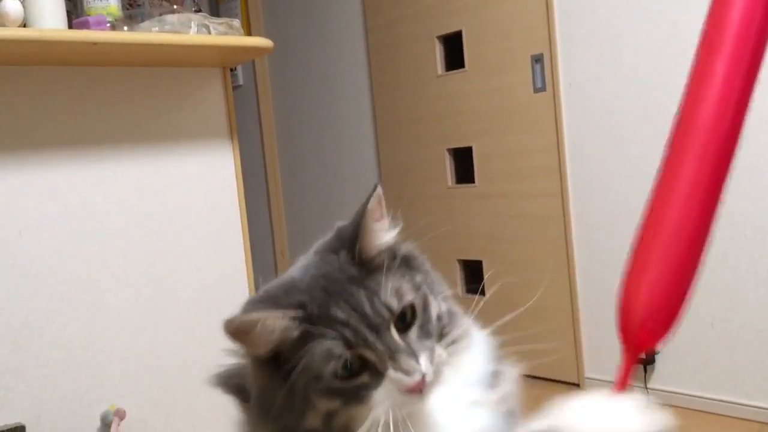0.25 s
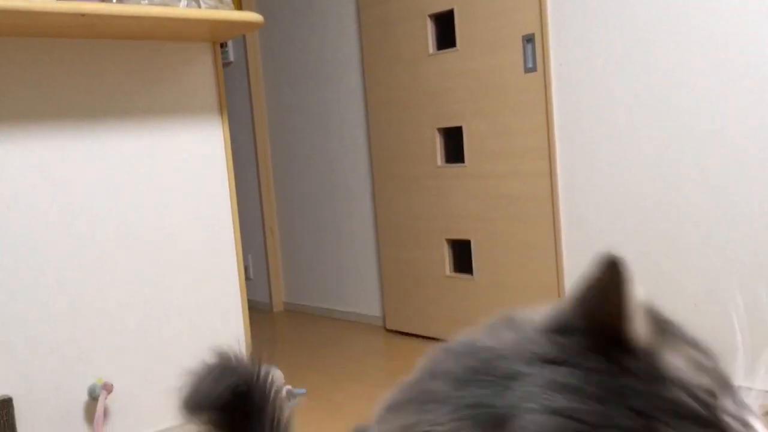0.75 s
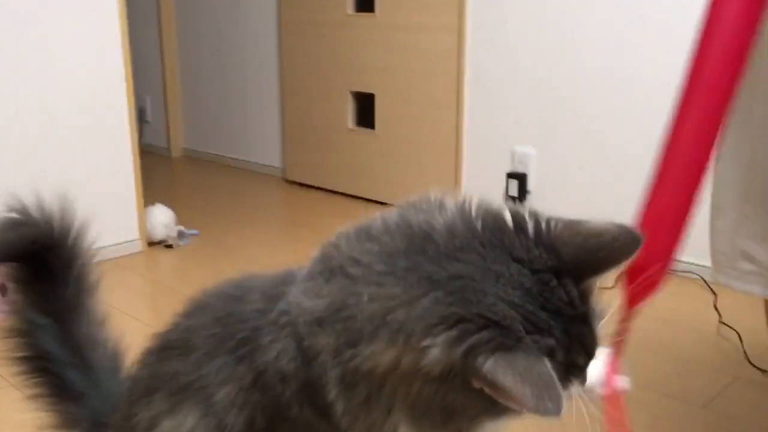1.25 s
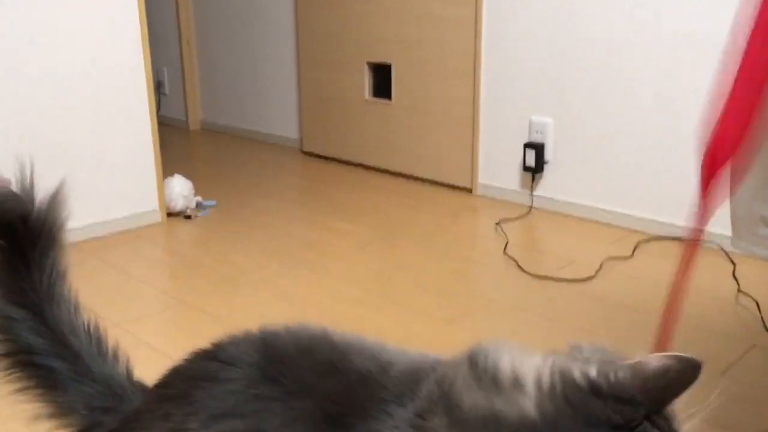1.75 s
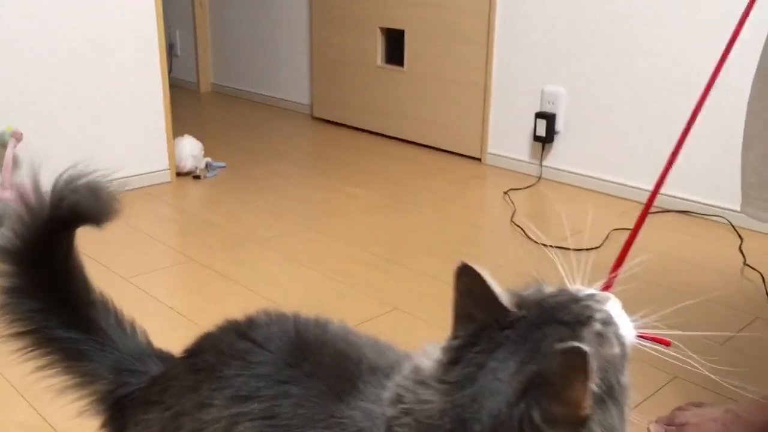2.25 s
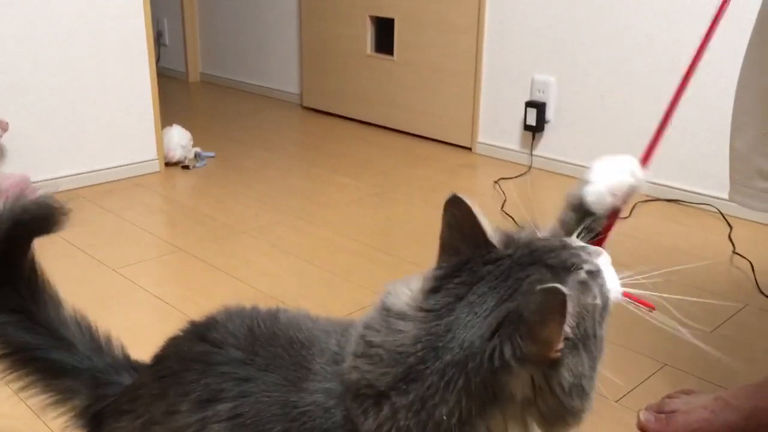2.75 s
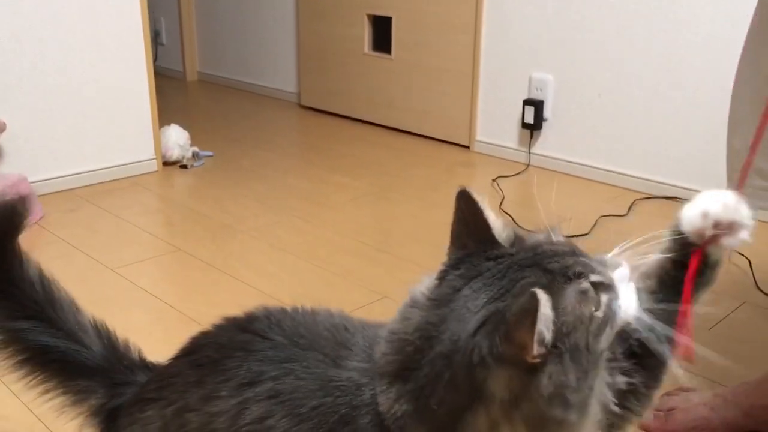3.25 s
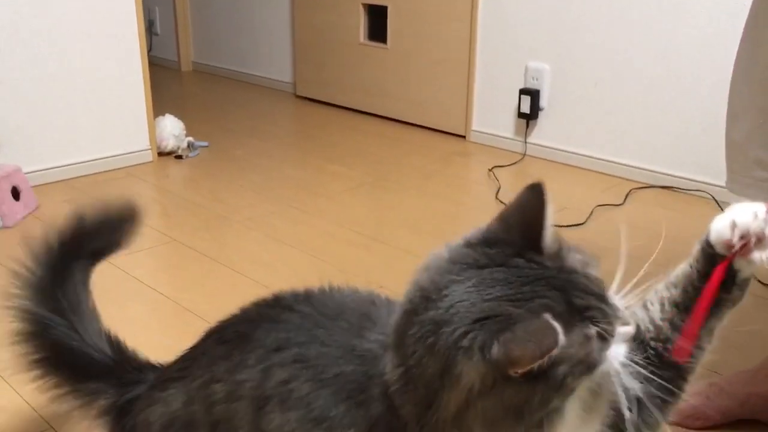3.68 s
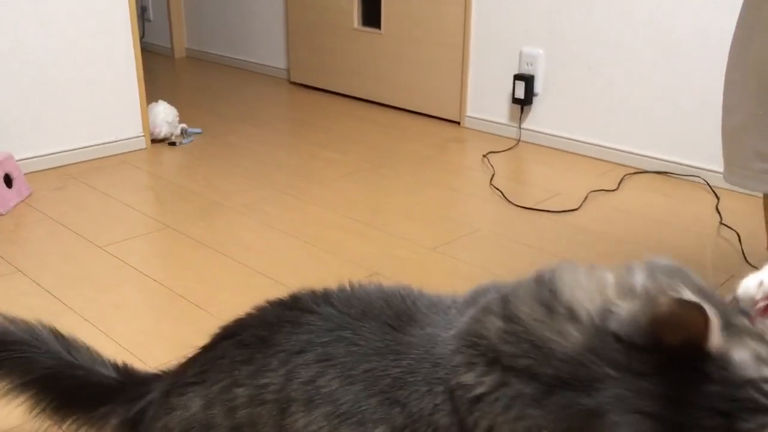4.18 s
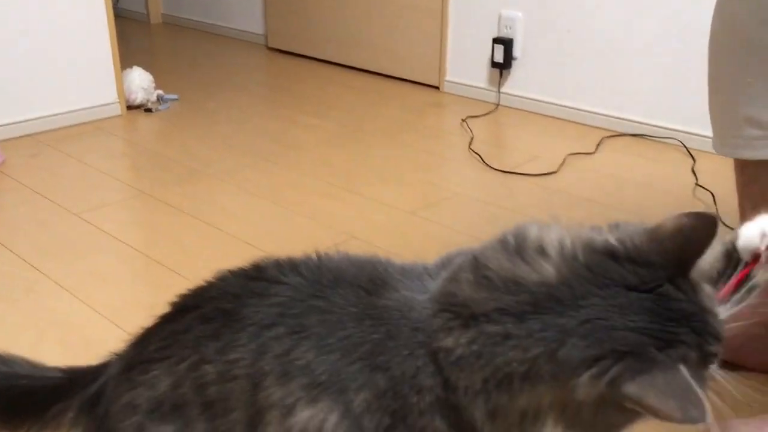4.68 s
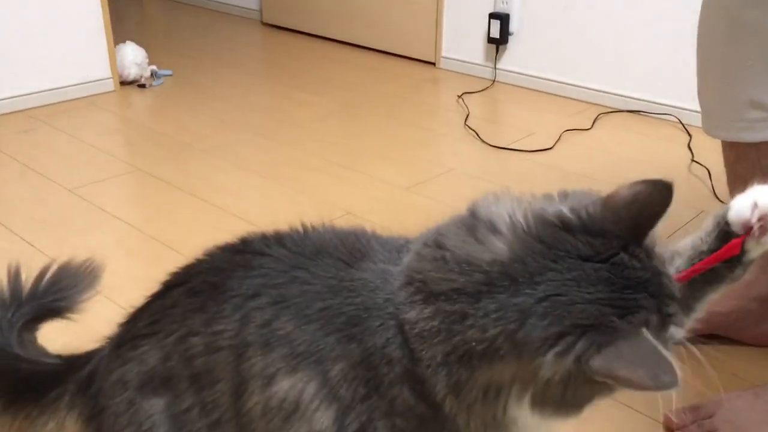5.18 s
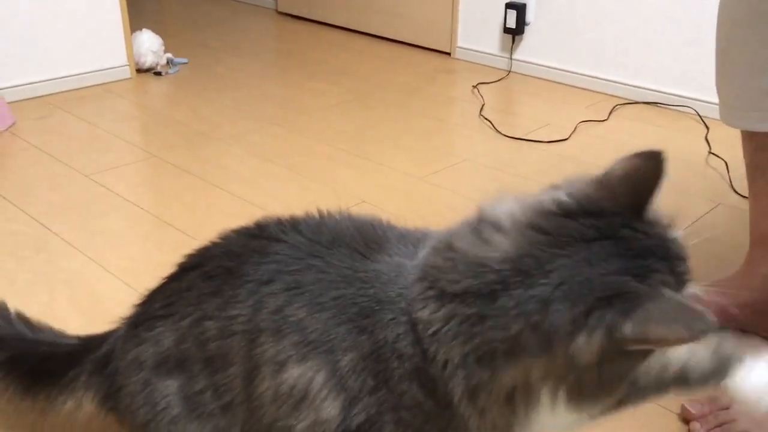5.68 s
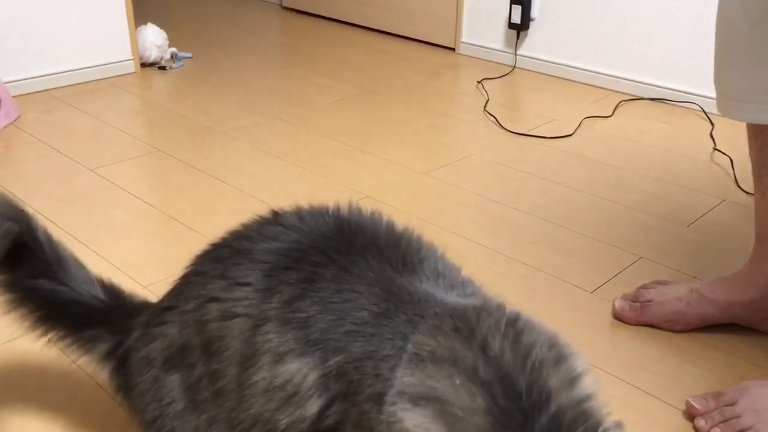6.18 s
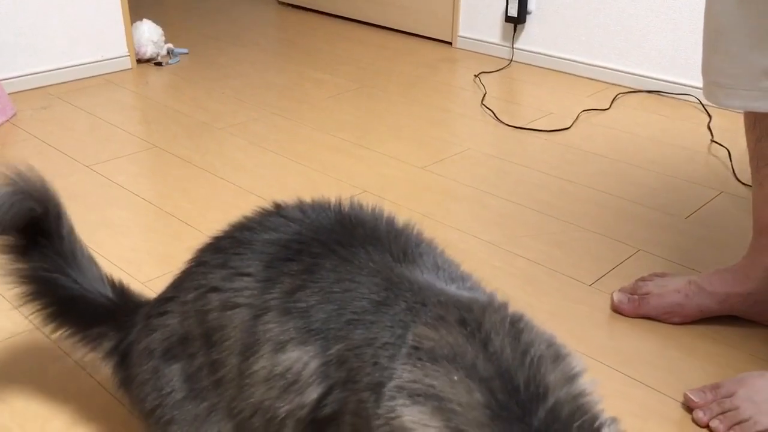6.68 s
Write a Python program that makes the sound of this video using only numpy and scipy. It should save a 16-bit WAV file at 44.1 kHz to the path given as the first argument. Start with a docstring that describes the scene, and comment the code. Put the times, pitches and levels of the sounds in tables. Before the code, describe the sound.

Close in a small, short-echoed room with a wooden floor, a cat bats a long rubber balloon with faint taps, clicks and creaks. The skin tears with a puff and a brief fluttering jet of air. Two small rubbery plucks follow, then quiet, then a loud sharp snap as the limp rubber whips back. A low beating machine hum runs underneath.

```python
"""Cat and long balloon

On a wooden floor in a small room, a cat plays with a long balloon: cracks of noise for clicks and
creaks, short decaying tones for the boards, brushing noise for fur and paws. The skin tears and a jet of
fluttering noise rushes out for a quarter of a second. The cat tugs at the limp rubber, which whips back
with a sharp snap. Two machines hum as sine tones over noise for rumble, room air and a far drone."""
import sys
import numpy as np
from scipy import signal
from scipy.fft import rfft, irfft, next_fast_len
from scipy.io import wavfile
from scipy.ndimage import map_coordinates

SR = 44100
rng = np.random.default_rng(int(sys.argv[2]) if len(sys.argv) > 2 else 0)


def file_out(sig):
    """Save sig as 16-bit WAV at sys.argv[1]."""
    # one column per channel
    cols = np.atleast_2d(sig).T
    # limit, then scale
    lim = np.clip(cols, -1, 1)
    pcm = np.round(lim * 32767).astype(np.int16)
    wavfile.write(sys.argv[1], SR, pcm)


N = 305304  # length [samples]


def amp(db):
    """Decibels to gain."""
    return 10 ** (np.asarray(db) / 20)


def unit(x):
    """Scale to rms 1."""
    return x / np.sqrt(np.mean(x ** 2) + 1e-20)


def along(points, hz):
    """Read (frequency [Hz], value) points on a log frequency axis."""
    f, v = np.transpose(points)
    return np.interp(np.log(hz + 1), np.log(f + 1), v)


def wobble(rate):
    """A smooth random curve, rate knots a second."""
    knots = rng.standard_normal(int(N * rate / SR) + 4)
    fine = np.arange(0, len(knots) - 1, 0.125)
    curve = map_coordinates(knots, [fine])  # cubic spline through the knots
    return np.interp(np.arange(N) * rate / SR, fine, curve)


def held(start, length, rise, fall):
    """Gain per sample: a straight rise, a hold until start + length, an exponential release."""
    t = np.arange(N) / SR - start
    return np.clip(t / rise, 0, 1) * np.exp(-np.maximum(t - length, 0) / fall)


def band(low_hz, high_hz):
    """(frequency [Hz], level [dB]) colour of a band with steep edges."""
    hz = np.geomspace(100, 20000, 40)
    low_edge = 1 + (low_hz / hz) ** 6
    high_edge = 1 + (hz / high_hz) ** 9
    return np.c_[hz, -10 * np.log10(low_edge * high_edge)]


def noise(spectrum, size=N):
    """Random-phase noise of rms 1 with the given colour."""
    m = next_fast_len(size)
    hz = np.fft.rfftfreq(m, 1 / SR)
    phases = np.exp(2j * np.pi * rng.random(len(hz)))
    return unit(irfft(amp(along(spectrum, hz)) * phases, m)[:size])


def burst(spectrum, length, steep):
    """A crack with an even, smooth colour and rms 1 over its length; steep sets how abruptly it ends."""
    t = np.arange(2048) / SR
    shape = (1 - np.exp(-t / 0.0002)) / (1 + (t / length) ** steep)
    # Only the phases are random, so the colour stays smooth.
    scatter = np.angle(rfft(shape * rng.standard_normal(len(t))))
    colour = amp(along(spectrum, np.fft.rfftfreq(len(t), 1 / SR)))
    x = np.sqrt(shape) * irfft(colour * np.exp(1j * scatter))
    return x * np.sqrt(length * SR / np.sum(x ** 2))


def ring(hz, t60, attack):
    """One dying mode: a sine that loses 60 dB in t60 seconds."""
    t = np.arange(SR // 2) / SR
    return np.sin(2 * np.pi * hz * t) * amp(-60 * t / t60) * (1 - np.exp(-t / attack))


def add(track, s, sound):
    """Mix a sound into the track at time s."""
    part = track[round(s * SR):][:len(sound)]
    part += sound[:len(part)]


THUMP_ATTACK_S = 0.0011  # rise of every soft blow
# air through the hole: it builds up as the hole widens, swells, and stops when the tube is empty
JET_START_S, JET_LENGTH_S, JET_RISE_S, JET_FALL_S = 1.782, 0.24, 0.024, 0.002
JET_START_DB, JET_SWELL_DB_PER_S = -34, 9.5
# colour of the escaping air: (frequency [Hz], relative density [dB])
JET_COLOUR = [(150, -13.5), (300, -14), (470, -28), (800, -14), (1200, -19), (2200, -11), (3000, -16),
              (4700, -8.5), (5900, -3.5), (9500, -1), (13500, -2), (15800, -7.5)]
# the hole tears open, the empty tube collapses: (time [s], level [dB], length [s])
PUFFS = [(1.7834, -30.5, 0.013), (2.018, -38.5, 0.0028)]
# colour of both puffs: (frequency [Hz], relative density [dB])
PUFF_COLOUR = [(100, 9), (400, -1.5), (1300, 0.5), (2200, -4), (3200, -11.5), (8000, -3.5)]
# the tube shudders after it tears: (delay after jet start [s], level [dB], frequency [Hz], t60 [s])
SHUDDERS = [(.004, -30.5, 236.1, .035), (0.017, -32, 71, 0.22)]


def puncture():
    """The skin tears with a puff and a shudder; a fluttering jet flows until the tube is empty."""
    flutter = unit(amp(0.55 * wobble(120) + 1.1 * wobble(1100)))
    age = np.clip(np.arange(N) / SR - JET_START_S, 0, JET_LENGTH_S)
    swell = amp(JET_START_DB + JET_SWELL_DB_PER_S * age)
    flow = swell * held(JET_START_S, JET_LENGTH_S, JET_RISE_S, JET_FALL_S)
    out = flow * flutter * noise(JET_COLOUR)
    for s, db, length in PUFFS:
        add(out, s, amp(db) * burst(PUFF_COLOUR, length, steep=1.6))
    for delay, db, hz, t60 in SHUDDERS:
        add(out, JET_START_S + delay, amp(db) * ring(hz, t60, THUMP_ATTACK_S))
    return out


# the rubber lets go, flies back and slaps home: (time [s], level [dB], length [s])
SNAPS = [(5.5959, -21, 0.00056), (5.597, -33, 0.0029), (5.6018, -12, 0.0033), (5.6033, -26, 0.0023)]
# colour of the slap: (frequency [Hz], relative density [dB])
SLAP_COLOUR = [(100, -12), (400, -9.5), (1200, -8.5), (2600, -7), (3700, 1.5), (4700, -1.5), (5900, 1),
               (7300, 0.5), (9000, -4.5), (10300, -3), (11200, 6), (12300, -1), (15500, 1), (17000, -4.5)]
THUD_DB, THUD_HZ, THUD_T60_S = -23.5, 190, 0.013  # the weight of the rubber landing


def snap():
    """The stretched balloon is released and slaps back on itself; its last contact adds a small thud."""
    out = np.zeros(N)
    for s, db, length in SNAPS:
        add(out, s, amp(db) * burst(SLAP_COLOUR, length, steep=4.5))
    last_contact_s = SNAPS[-1][0]
    add(out, last_contact_s, amp(THUD_DB) * ring(THUD_HZ, THUD_T60_S, THUMP_ATTACK_S))
    return out


# sharp clicks of claws, and of the balloon's end landing: (time [s], level [dB], low band edge [Hz])
CLICKS = [(0.2265, -47, 1630), (.706, -54, 1000), (1.5928, -45.5, 1470), (1.5941, -35.5, 9500),
          (3.1023, -39.5, 1430), (3.2421, -33.5, 1470), (3.802, -68, 1700), (4.935, -69, 1500),
          (4.9705, -56, 1440), (5.58, -53.5, 3000), (5.7596, -47, 2950)]
CLICK_S, CLICK_SPAN = 0.0015, 5.2  # length of a click; its top band edge over its low edge
# dull creaks of slipping rubber, the last from the balloon's end landing:
# (time [s], nominal peak level [dB])
CREAKS = [(0.4, -56), (0.611, -55.5), (1.5167, -60), (1.5489, -60), (1.5655, -49.5), (1.6114, -45),
          (1.6447, -45), (1.6573, -44), (5.7646, -42.5)]
CREAK_S, CREAK_LOW_HZ, CREAK_HIGH_HZ = 0.003, 1400, 3000
CREAK_RMS_DB = -9.5  # rms relative to the nominal peak
# the taut rubber slips off a claw: (time [s], level [dB] before the mode levels)
PLUCKS = [(3.101, -43.5), (3.2422, -31)]
# modes of the taut skin: (frequency [Hz], level relative to the pluck [dB], t60 [s])
SKIN_MODES = [(610, -16.5, 0.04576), (1220, -9, .02), (1976, 3, 0.01546), (1919.2, -17.5, 0.22),
              (2360, -4, 0.02), (2960, -3, 0.0086), (3372.4, -10, 0.01384), (4757.8, -3.5, 0.014),
              (6520, -9, 0.025)]


def clicks_and_creaks():
    """Clicks are tiny cracks, creaks are duller ones; taut rubber slipping off a claw rings the skin."""
    out = np.zeros(N)
    for s, db, low_hz in CLICKS:
        colour = band(low_hz, CLICK_SPAN * low_hz)
        add(out, s, amp(db) * burst(colour, CLICK_S, steep=2.5))
    creak_colour = band(CREAK_LOW_HZ, CREAK_HIGH_HZ)
    for s, peak_db in CREAKS:
        add(out, s, amp(peak_db + CREAK_RMS_DB) * burst(creak_colour, CREAK_S, steep=2.5))
    for s, db in PLUCKS:
        for hz, mode_db, t60 in SKIN_MODES:
            level = amp(db + mode_db + rng.normal(0, 1))  # each pluck excites the modes unevenly
            add(out, s, level * ring(hz, t60, attack=0.00043))
    return out


TICK_END_S, TICK_DB, TICK_SPREAD_DB, TICK_LOW_HZ = 1.45, -71, 1.5, 1200


def faint_ticks(count):
    """Very faint dry ticks, scattered over the first second and a half."""
    out = np.zeros(N)
    colour = band(TICK_LOW_HZ, CLICK_SPAN * TICK_LOW_HZ)
    for s in TICK_END_S * rng.random(count):
        level = amp(TICK_DB + TICK_SPREAD_DB * rng.standard_normal())
        add(out, s, level * burst(colour, CLICK_S, steep=2.5))
    return out


# paws and the balloon's end on the boards: (time [s], level [dB], frequency [Hz])
KNOCKS = [(.310, -36, 280), (.549, -45, 257), (.622, -41, 277), (5.761, -51, 990), (5.764, -42, 232)]
KNOCK_T60_S = 0.039  # how long the boards ring


def knocks():
    """A soft contact draws only one short note from the boards."""
    out = np.zeros(N)
    for s, db, hz in KNOCKS:
        add(out, s, amp(db) * ring(hz, KNOCK_T60_S, THUMP_ATTACK_S))
    return out


# fur and paws brush the rubber: (start [s], length [s], level [dB])
STROKES = [(0.287, .11, -68), (0.45, 0.047, -70.5), (0.666, .15, -74), (6.82, .1, -77.5)]
STROKE_RISE_S, STROKE_FALL_S = 0.023, 0.076
# colour of the brushing: (frequency [Hz], relative density [dB])
BRUSH_COLOUR = [(700, 8), (1800, -1), (3500, -1.5), (5800, 0.5), (7200, -5), (9000, -7.5), (15000, -12)]
# faint airy hisses: (start [s], length [s], level [dB] before a slight waver)
HISSES = [(0.782, 0.12, -73), (0.917, 0.038, -66.5), (5.649, 0.363, -67)]
HISS_RISE_S, HISS_FALL_S = 0.02, 0.008
# colour of the hisses: (frequency [Hz], relative density [dB])
HISS_COLOUR = [(400, -6), (1200, -0.5), (2000, 1.5), (5000, 2), (10000, 0), (15500, -2.5)]
# centre pitch and level of a thin whistle that ends before the puncture
WHISTLE_HZ, WHISTLE_DB, WHISTLE_END_S = 3515, -85.5, 1.53


def rustle():
    """Grainy brushing on the rubber, airy hisses and a thin wavering whistle with its octave."""
    strokes = sum(amp(db) * held(s, length, STROKE_RISE_S, STROKE_FALL_S) for s, length, db in STROKES)
    grain = unit(amp(3.3 * wobble(150)))
    brush = strokes * grain * noise(BRUSH_COLOUR)
    hisses = sum(amp(db) * held(s, length, HISS_RISE_S, HISS_FALL_S) for s, length, db in HISSES)
    hiss = hisses * amp(1.1 * wobble(60)) * noise(HISS_COLOUR)
    pitch = WHISTLE_HZ * (1 + 0.0044 * wobble(120))
    phase = 2 * np.pi * np.cumsum(pitch) / SR
    waver = amp(WHISTLE_DB + 1.2 * wobble(30) + 0.96 * wobble(3))
    tone = np.sin(phase) + amp(-3) * np.sin(2 * phase)
    whistle = held(0, WHISTLE_END_S, rise=0.17, fall=0.035) * waver * tone
    return brush + hiss + whistle


# first echoes in the small room: (delay [s], level [dB])
WALLS = [(.0052, -21), (.0108, -20), (.0125, -23), (.0208, -21), (.032, -25.5)]
# decay of the diffuse tail: (frequency [Hz], t60 [s])
ROOM_DECAY = [(100, 0.28), (1000, .3), (2500, 0.23), (3900, 0.27), (6000, 0.25), (10000, 0.21),
              (16000, 0.16)]


def room(x, tail_db):
    """Direct sound, a few hard echoes and a short diffuse tail whose high treble dies first."""
    hz, t, z = signal.stft(rng.standard_normal(SR // 2), SR, nperseg=256)
    decay = amp(-60 * t / along(ROOM_DECAY, hz)[:, None])
    tail = signal.istft(z * decay, SR, nperseg=256)[1]
    tail = tail * (1 - np.exp(-np.arange(len(tail)) / SR / 0.0008))
    response = amp(tail_db) * tail / np.linalg.norm(tail)
    response[0] = 1  # direct sound
    for delay, db in WALLS:
        add(response, delay, amp([db]))
    return signal.fftconvolve(x, response)[:N]


# machine hum; the two strongest lines beat: (frequency [Hz], rms level [dB] before HUM_TRIM_DB)
HUM = [(42, -78), (61.9, -72), (71.03, -56), (83.82, -58.5), (95.8, -70), (142.05, -72), (167.55, -69),
       (191.4, -76)]
HUM_TRIM_DB, RUMBLE_DB, AIR_DB = -0.34, -64.0, -62.5
# colour of the low rumble: (frequency [Hz], relative density [dB])
RUMBLE_COLOUR = [(15, -27.5), (25, -13.5), (33, -3), (42, -5), (55, -1.5), (70, 0), (86, 4), (110, -0.5),
                 (150, -13), (250, -38.5)]
# colour of the room air: (frequency [Hz], relative density [dB])
AIR_COLOUR = [(65, -34.5), (110, -6), (170, -2.5), (238, -9), (281, -3.5), (368, -9.5), (400, -13.5),
              (674, -20), (780, -25), (921, -17), (981, -23.5), (1620, -29.5), (4980, -39), (11500, -44.5),
              (16000, -53)]
# rise and fall of the far drone: (time [s], height [dB])
DRONE_CURVE = [(0.0, -71), (0.42, -71.5), (1.02, -75.5), (1.56, -73.5), (1.93, -71.5), (2.1, -76),
               (2.51, -74), (2.91, -71), (4.05, -71), (4.37, -74.5), (5.49, -75), (5.76, -71.5),
               (6.32, -75.5), (6.92, -70.5)]
DRONE_DB, DRONE_SWING = -77, 2.6  # mean level [dB]; how strongly the drone swells per dB of this curve
# colour of the far drone: (frequency [Hz], relative density [dB])
DRONE_COLOUR = [(300, -18.5), (600, -0.5), (820, -3.5), (920, -0.5), (1030, -4.5), (1500, -9), (2500, -18),
                (5000, -37)]


def background():
    """Two steady machine notes beat over rumble, room air and a far drone that rises and falls."""
    t = np.arange(N) / SR
    drift = 0.0002 * wobble(2)  # the motors run a little unevenly [s]
    hum = sum(amp(db) * np.sqrt(2) * np.sin(2 * np.pi * hz * (t + drift)) for hz, db in HUM)
    height_db = np.interp(t, *np.transpose(DRONE_CURVE))
    drone_db = DRONE_DB + DRONE_SWING * (height_db - height_db.mean())
    drone = amp(drone_db) * noise(DRONE_COLOUR)
    air = amp(AIR_DB + 0.46 * wobble(4)) * noise(AIR_COLOUR)
    rumble = amp(RUMBLE_DB) * noise(RUMBLE_COLOUR)
    return amp(HUM_TRIM_DB) * hum + rumble + air + drone


def scene():
    """Cat and balloon in the room, over the hum."""
    play = puncture() + clicks_and_creaks() + faint_ticks(count=9) + knocks() + rustle()
    in_room = room(play, tail_db=-9.5) + room(snap(), tail_db=-8.5)
    return (in_room + background())[None]


# ripple of the microphone port: (frequency [Hz], gain [dB])
PORT = [(4300, 0), (4950, -1), (5750, 1.5), (6400, 0.5), (7150, 0), (7850, -2.5), (8350, 0), (8900, -0.5),
        (9550, 1.5), (10400, -4), (11200, 0), (11950, -1.5), (12500, 1), (13100, -1.5)]
TOP_HZ = 15950  # band limit


def record(dry):
    """The microphone port ripples the treble; a very steep filter cuts what lies above the band limit."""
    m = next_fast_len(N + SR // 2)
    hz = np.fft.rfftfreq(m, 1 / SR)
    coloured = rfft(dry, m) * amp(along(PORT, hz))
    return irfft(coloured / (1 + (hz / TOP_HZ) ** 160), m)[:, :N]


dry = scene()
out = record(dry)
file_out(out)
```